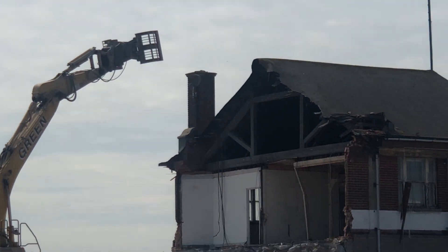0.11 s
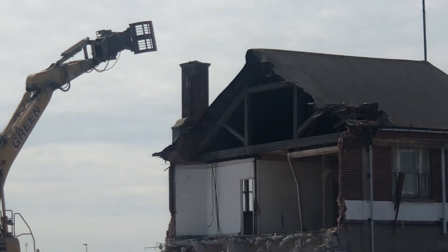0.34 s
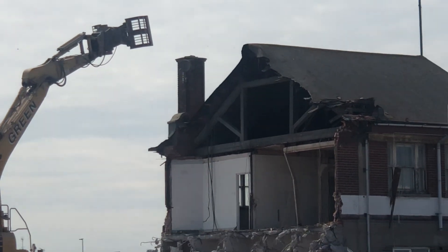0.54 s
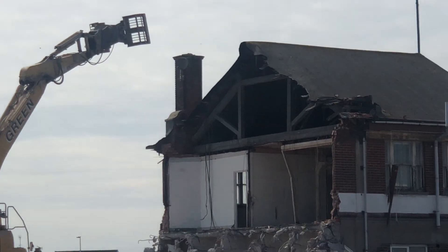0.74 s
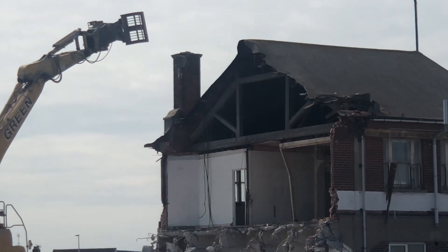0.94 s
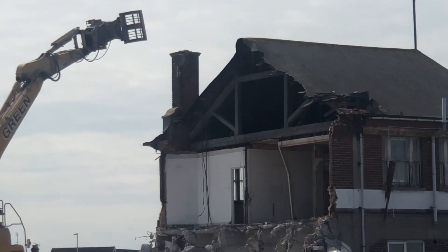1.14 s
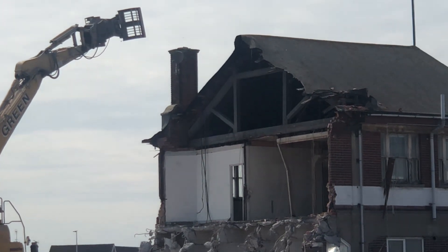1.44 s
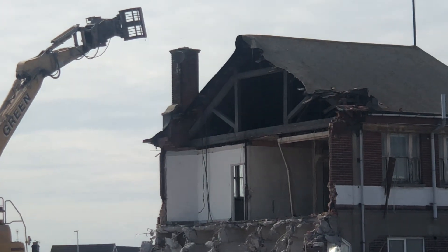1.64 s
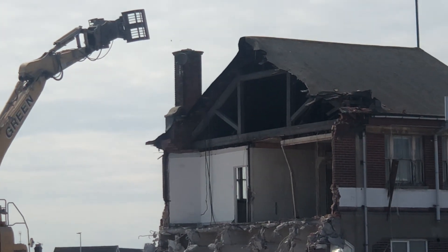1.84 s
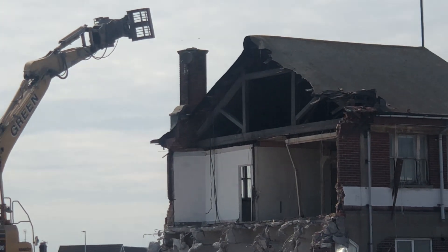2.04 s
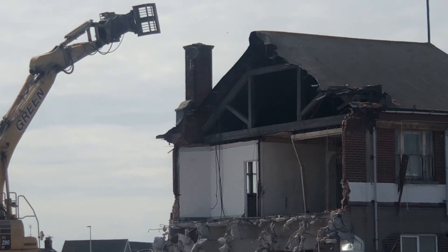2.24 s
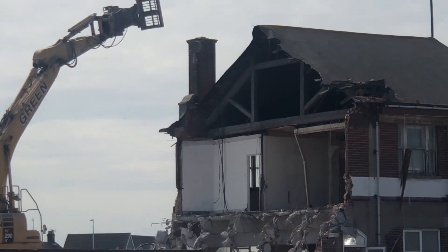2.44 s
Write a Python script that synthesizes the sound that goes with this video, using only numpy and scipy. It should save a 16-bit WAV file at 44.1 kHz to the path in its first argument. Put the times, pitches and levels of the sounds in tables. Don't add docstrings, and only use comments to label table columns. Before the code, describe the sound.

Two hard, hollow knocks on a camera's plastic casing, the second softer, each followed by a dull scrape; light taps and faint motor ticking, with quiet far machine rumble, wind and hiss outdoors, very close built-in microphone.

```python
import sys
import numpy as np
from scipy import signal
from scipy.io import wavfile
from scipy.ndimage import uniform_filter1d

SR = 44100
rng = np.random.default_rng(int(sys.argv[2]) if len(sys.argv) > 2 else 0)


def master_out(mix):
    frames = np.transpose(np.atleast_2d(mix))
    ceiling = np.clip(frames, -1, 1)
    pcm = np.round(ceiling * 32767).astype(np.int16)
    wavfile.write(sys.argv[1], SR, pcm)


def decibels_to_gain(level_db):
    exponent = np.asarray(level_db, float) / 20
    return 10 ** exponent


N = 114660

# start_s, swell_s
KNOCK_TIMES = [
    (.21015, .0023),
    (.8628, .0026),
]
# ring_db, thump_db, grip_db, crack_db
KNOCK_LEVELS = [
    (0.04, -20, -24.5, -11.5),
    (-5.5, -25, -26, -14.5),
]
# pitch_hz, level_db, t60_s
CRACK_MODES = [(457.4, 3.5, 0.021), (1210, 2.5, 0.0067), (1482, 3.5, 0.0061), (1840, -10.5, 0.0084),
               (2570, -17, .012), (3120, -27, .012), (3640, -34.5, .01), (5160, -34, 0.0091)]
# start_s, level_db, brightness_db
SCRAPE_STROKES = [
    [(.214, -30.5, -8.5), (.228, -30.5, -5), (.255, -41, 4.5), (.281, -37.5, 1), (.287, -44.5, -15),
     (.31, -82, -32)],
    [(.868, -38.5, -1.5), (.92, -45, 2), (1.0, -45.5, -1), (1.11, -50, -1.5), (1.135, -45.5, -6),
     (1.165, -48, 1), (1.170, -41, -2), (1.2, -45, 2), (1.33, -49.5, -5.5), (1.56, -54, -1),
     (1.76, -53.5, -12.5), (1.776, -70, -29)],
]
# pitch_hz, width_hz, level_db, brightness_share (ratio)
SHELL_MODES = [(111, 130, -1, -.5), (200, 67, 1.5, -.5), (329.5, 200, -5, 0.26), (510.4, 130, 2.5, 0.2),
               (593, 150, -7.5, 0.2), (794.4, 190, 0.5, 0.2), (1111.5, 310.5, -11, 1),
               (1457, 260, -6, 0.93), (2000, 400, -18.5, 0.95), (2750, 600, -20, 1.2)]
# start_s, level_db, pitch_hz, t60_s
TOUCHES = [(0.071, -45, 247, .04), (0.111, -42, 480, 0.013), (0.187, -39, 900, 0.021),
           (.189, -45.5, 560, .025), (.200, -49, 715, .02), (0.397, -43.5, 238, .05),
           (.532, -49.5, 702, .03), (0.556, -64, 3550, .03), (0.643, -54.5, 296, 0.048),
           (.704, -60, 600, .03), (.842, -46.5, 745, .03), (.898, -55, 506, 0.046),
           (1.124, -38, 493.7, 0.21), (1.168, -50, 2300, 0.043), (1.169, -49, 1800, .04),
           (1.172, -57.5, 2960, .04), (1.186, -55, 2000, .04), (1.471, -42.5, 215.5, 0.081),
           (1.69, -44.5, 107, .12), (1.435, -47, 596, 0.15), (1.635, -32, 330, 0.014),
           (1.753, -32, 606, 0.014), (1.856, -47.5, 210, 0.054), (2.3, -53.5, 200, 0.061),
           (0.261, -67.5, 5100, 0.06)]
# start_s, level_db
MOTOR_STEPS = [
    (.0243, -58.5),
    (.0034, -70),
    (.0180, -76),
]
# pitch_hz, density_db (per Hz)
SITE_COLOUR = [(22, -29), (150, -14), (230, -1.5), (320, -3), (850, -3), (1100, -7), (1700, -16.5),
               (2200, -29.5)]
# start_s, level_db
GUST_LEVELS = [(0.0, -59.5), (0.15, -55), (0.4, -58), (0.55, -55), (0.73, -62.5), (0.89, -58.5),
               (1.01, -67), (1.06, -52), (1.59, -53.5), (1.84, -58), (2.01, -60), (2.6, -58.5)]
# pitch_hz, density_db (per Hz)
RUMBLE_COLOUR = [(22, -30), (35, -13.5), (60, -9.5), (90, 2), (130, -6), (200, -11), (280, -31)]
# pitch_hz, density_db (per Hz)
HISS_COLOUR = [(200, 4.5), (2500, 2), (4000, -0.5), (6500, -4), (9000, -6), (12000, -10), (15700, -14)]


def evened(x):
    return x / np.sqrt(np.mean(x ** 2) + 1e-20)


def add(mix, start_s, sound):
    part = mix[round(start_s * SR):][:len(sound)]
    part += sound[:len(part)]


def lowpass(x, order, edge_hz):
    return signal.sosfilt(signal.butter(order, edge_hz, fs=SR, output="sos"), x)


def resonate(x, pitch_hz, width_hz):
    turn = np.exp(2j * np.pi * pitch_hz * np.arange(len(x)) / SR)
    r = np.exp(-np.pi * width_hz / SR)
    smooth = signal.lfilter([(1 - r) ** 2], [1, -2 * r, r * r], x / turn)
    return 2 * (turn * smooth).real


def swoop(pitch_hz, glide_hz, glide_s, peak_s, rise, fall):
    t = np.arange(4000) / SR
    u = t / peak_s
    turns = pitch_hz * t + glide_hz * glide_s * (1 - np.exp(-t / glide_s))
    swell = u ** rise * np.exp(rise / fall * (1 - u ** fall))
    return -np.sin(2 * np.pi * turns) * swell


def ring(pitch_hz, t60_s, rise_s=.001):
    t = np.arange(4000) / SR
    return (1 - np.exp(-t / rise_s)) * decibels_to_gain(-60 * t / t60_s) * np.sin(2 * np.pi * pitch_hz * t)


def noise(colour, lumps_db, swell_db):
    frames = N // 256 + 5
    hz = np.fft.rfftfreq(1024, 1 / SR)
    a, b, patches = rng.standard_normal((frames, 513, 3)).T
    patches = uniform_filter1d(patches, size=6, axis=0)
    patches = evened(uniform_filter1d(patches, size=10, axis=1))
    swell = evened(uniform_filter1d(rng.standard_normal(frames), size=14))
    colour_hz, colour_db = np.transpose(colour)
    shape_db = np.interp(np.log(hz + 1), np.log(colour_hz + 1), colour_db, right=-90)[:, None]
    spectra = (a + 1j * b) * decibels_to_gain(shape_db + lumps_db * patches + swell_db * swell)
    return evened(signal.istft(spectra, nperseg=1024, noverlap=768)[1][:N])


def knocks():
    out = np.zeros(N)
    echo_s, echo_db = .0065, -17
    thump = swoop(82, 170, .009, peak_s=.00714, rise=2.0, fall=1.0)
    grip = swoop(326.5, 80, .003, peak_s=.002, rise=4.6, fall=0.92)
    crack = sum(decibels_to_gain(level_db) * ring(pitch_hz, t60_s) for pitch_hz, level_db, t60_s in CRACK_MODES)
    for (start_s, swell_s), levels in zip(KNOCK_TIMES, KNOCK_LEVELS):
        ring_db, thump_db, grip_db, crack_db = levels
        body = decibels_to_gain(ring_db) * swoop(715, 370, .001, swell_s, rise=1.6, fall=2.0)
        add(out, start_s, body + decibels_to_gain(thump_db) * thump - decibels_to_gain(grip_db) * grip + decibels_to_gain(crack_db) * crack)
        add(out, start_s + echo_s, decibels_to_gain(echo_db) * body)
    return lowpass(out, 4, 4700)


def shell_bands():
    slips_per_s, spread_db, clump_db = 7000, .8, 1.2
    slips = rng.standard_normal(N) * decibels_to_gain(spread_db * rng.exponential(1, N))
    slips = slips * (rng.random(N) < slips_per_s / SR)
    clumps = rng.standard_normal((N // 512 + 1, len(SHELL_MODES)))
    clumps = np.repeat(2.3 * uniform_filter1d(clumps, size=3, axis=0), 512, axis=0)
    clumps = decibels_to_gain(clump_db * uniform_filter1d(clumps, size=512, axis=0))[:N]
    bands = []
    for k, (pitch_hz, width_hz, _, _) in enumerate(SHELL_MODES):
        bands.append(evened((-1) ** k * clumps[:, k] * resonate(slips, pitch_hz, width_hz)))
    return bands


def fizz():
    t = np.arange(N) / SR
    start_s, end_s, rise_s, fall_s = .212, .266, .013, .004
    edge = np.clip(np.minimum((t - start_s) / rise_s, (end_s - t) / fall_s), 0, 1)
    colour = [(2500, -19.5), (5000, 2.5), (9000, -0.5), (15700, -6)]  # pitch_hz, density_db
    return decibels_to_gain(-69) * edge * noise(colour, lumps_db=2.0, swell_db=1.0)


def scrapes():
    t, out = np.arange(N) / SR, np.zeros(N)
    bands = shell_bands()
    for stroke in SCRAPE_STROKES:
        start_s, level_db, bright_db = np.transpose(stroke)
        level = np.interp(t, start_s, level_db, -120, -120)
        bright = np.interp(t, start_s, bright_db)
        for band, (_, _, mode_db, share) in zip(bands, SHELL_MODES):
            out += band * decibels_to_gain(level + mode_db - 6.0 + share * bright)
    return lowpass(out, 8, 3150) + fizz()


def taps():
    out = np.zeros(N)
    for start_s, level_db, pitch_hz, t60_s in TOUCHES:
        pair = ring(pitch_hz, t60_s) + .5 * ring(0.67 * pitch_hz, 0.54 * t60_s)
        add(out, start_s, decibels_to_gain(level_db) * pair)
    return out


def motor():
    out = np.zeros(N)
    frames_per_s, spread_db = 30, 1.6
    step = swoop(1480, 100, .001, peak_s=.0008, rise=1.5, fall=1.6)[:400]
    sizes = rng.standard_normal((N * frames_per_s // SR, len(MOTOR_STEPS)))
    for k, row in enumerate(sizes):
        for (start_s, level_db), size in zip(MOTOR_STEPS, row):
            add(out, k / frames_per_s + start_s, -decibels_to_gain(level_db + spread_db * size) * step)
    return out


def rumble():
    start_s, level_db = np.transpose(GUST_LEVELS)
    gust_db = 1.5 + np.interp(np.arange(N) / SR, start_s, level_db)
    return decibels_to_gain(gust_db) * noise(RUMBLE_COLOUR, lumps_db=1.6, swell_db=.5)


def engine_hum():
    wobble = evened(uniform_filter1d(rng.standard_normal(N), size=6000))
    turns = np.cumsum(43.1 + 0.65 * wobble) / SR
    return decibels_to_gain(-64 + 1.5 * wobble) * np.sin(2 * np.pi * turns)


def distant_site():
    return decibels_to_gain(-66) * noise(SITE_COLOUR, lumps_db=1.6, swell_db=.5)


def microphone_hiss():
    return decibels_to_gain(-73.5) * noise(HISS_COLOUR, lumps_db=1.0, swell_db=0.66)


def scene():
    handling = knocks() + scrapes() + taps() + motor()
    background = rumble() + engine_hum() + distant_site() + microphone_hiss()
    return (handling + background)[None]


def roll_off(x):
    return signal.sosfilt(signal.butter(12, 15740, fs=SR, output="sos"), x)


def record(dry):
    return roll_off(dry)


dry = scene()
out = record(dry)
master_out(out)
```